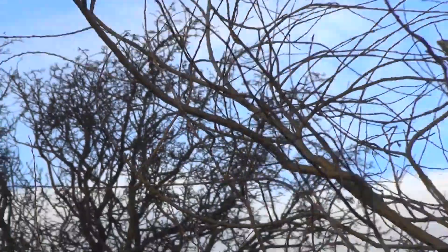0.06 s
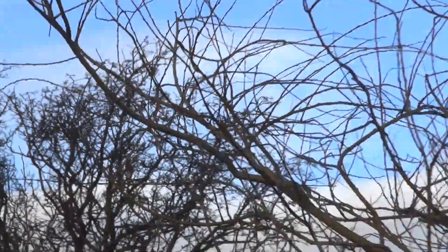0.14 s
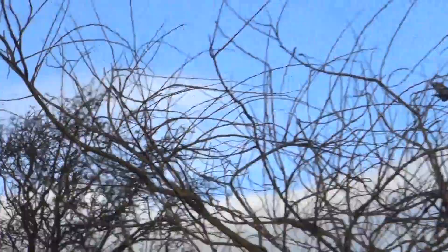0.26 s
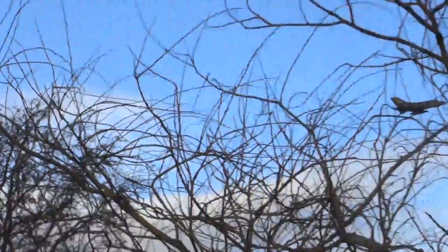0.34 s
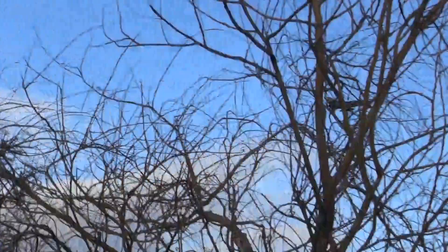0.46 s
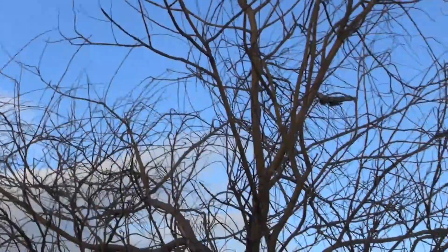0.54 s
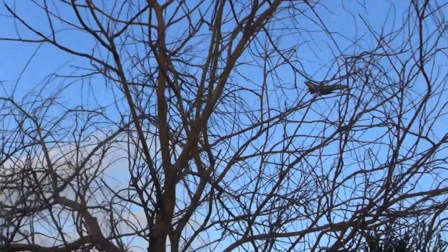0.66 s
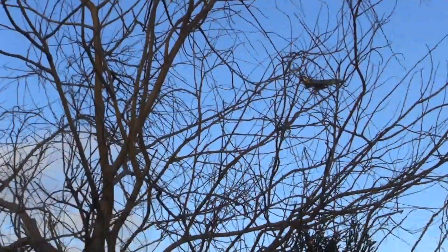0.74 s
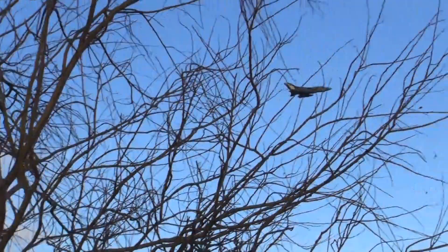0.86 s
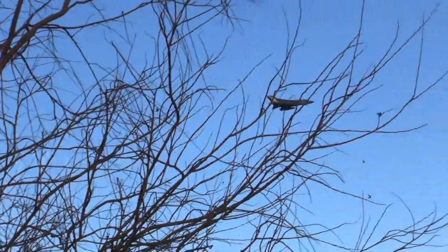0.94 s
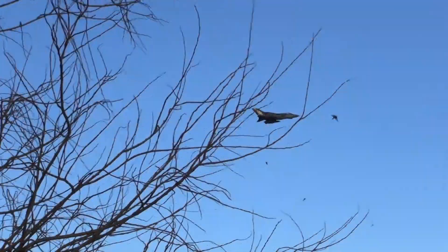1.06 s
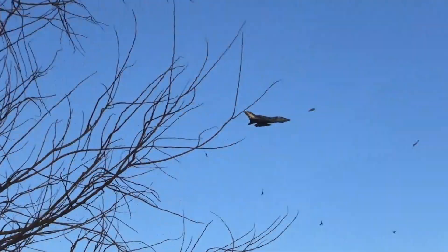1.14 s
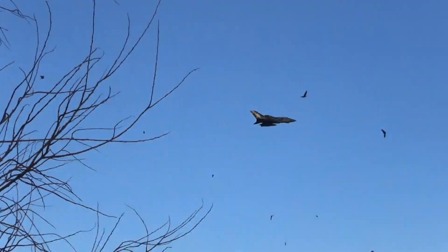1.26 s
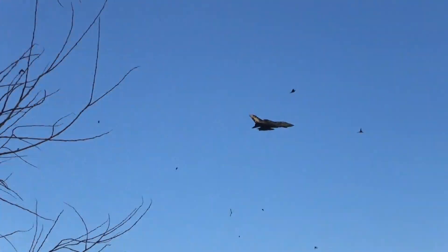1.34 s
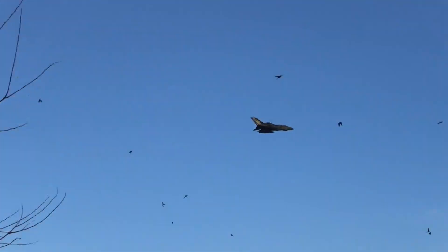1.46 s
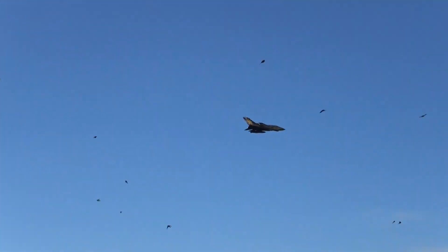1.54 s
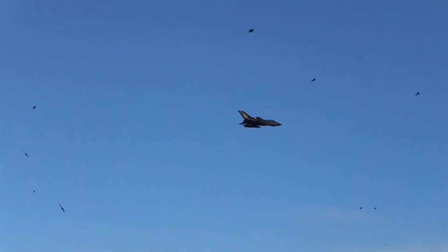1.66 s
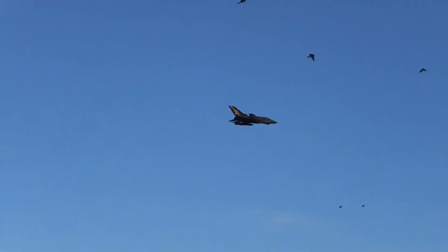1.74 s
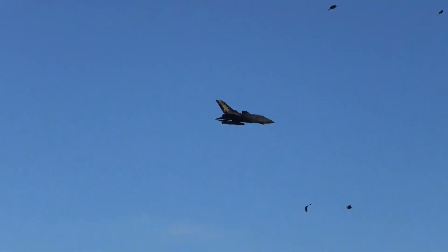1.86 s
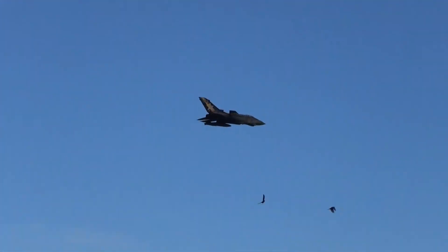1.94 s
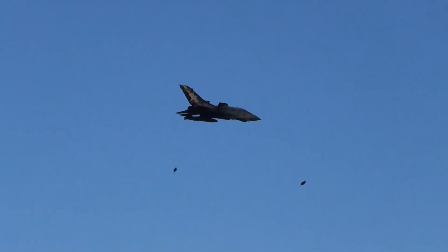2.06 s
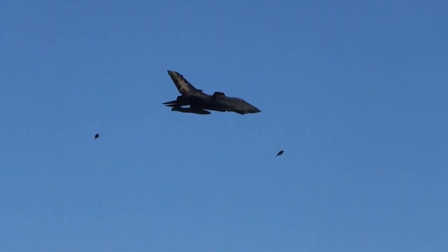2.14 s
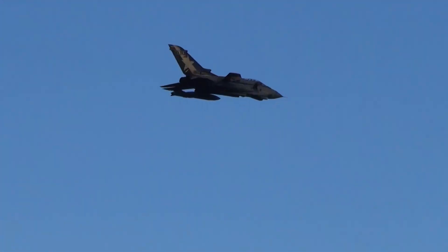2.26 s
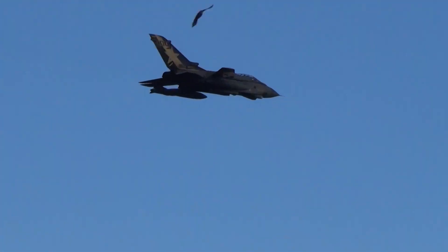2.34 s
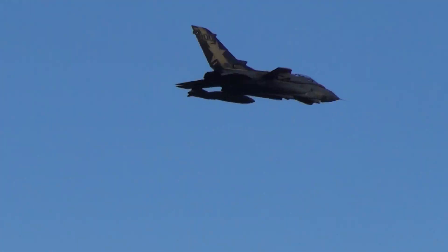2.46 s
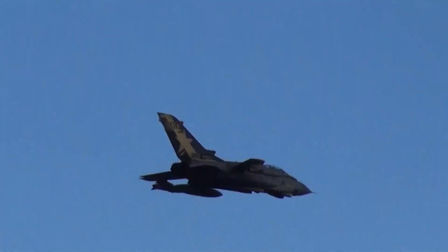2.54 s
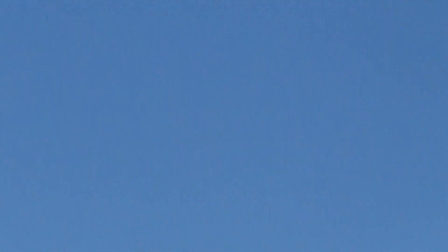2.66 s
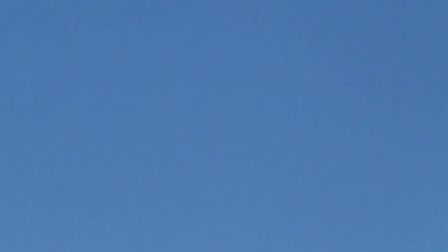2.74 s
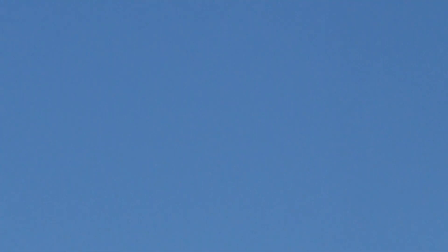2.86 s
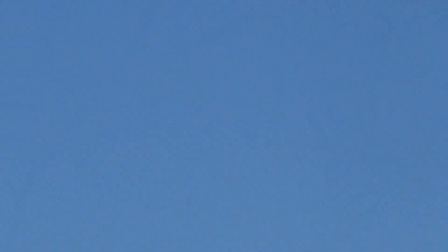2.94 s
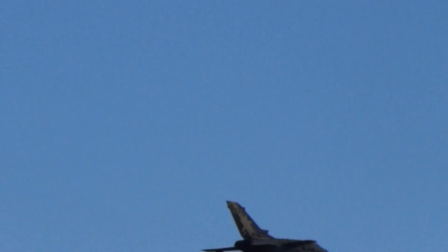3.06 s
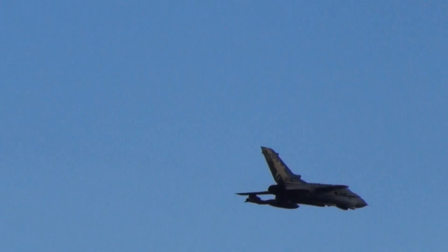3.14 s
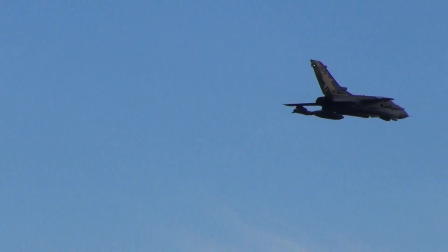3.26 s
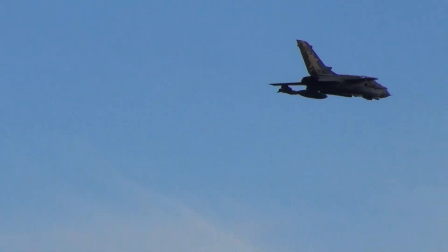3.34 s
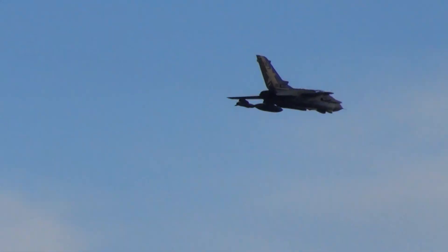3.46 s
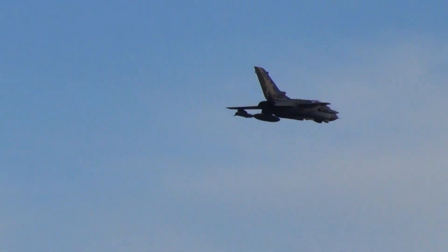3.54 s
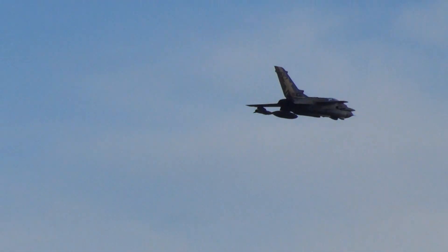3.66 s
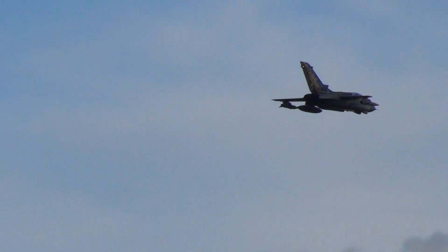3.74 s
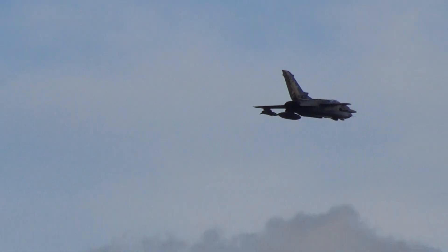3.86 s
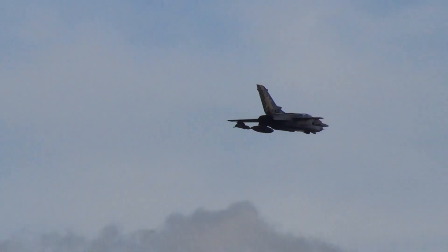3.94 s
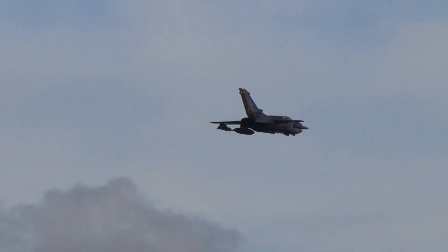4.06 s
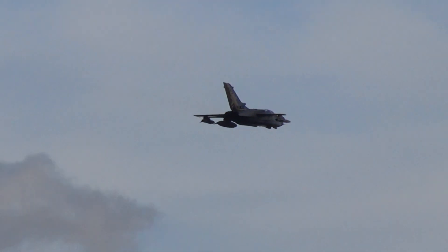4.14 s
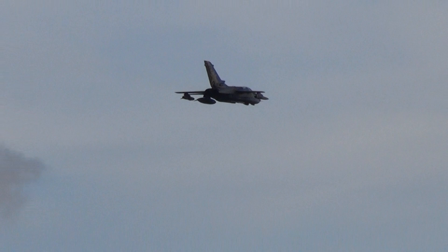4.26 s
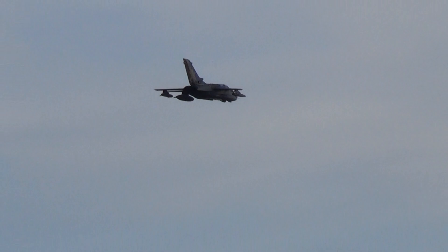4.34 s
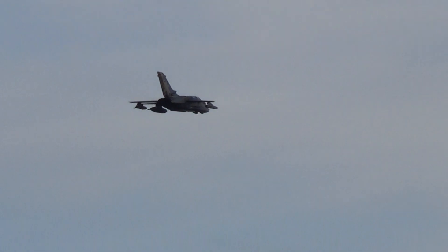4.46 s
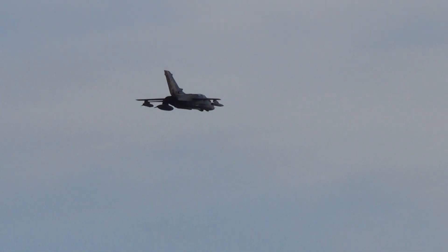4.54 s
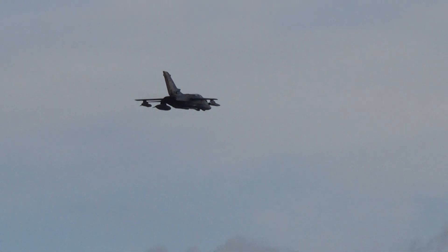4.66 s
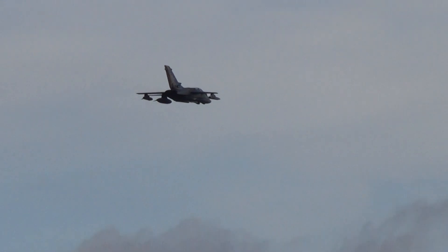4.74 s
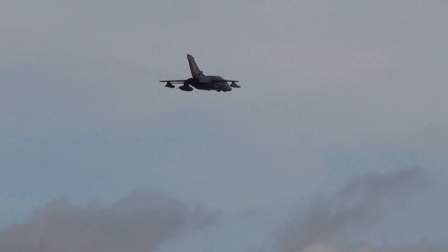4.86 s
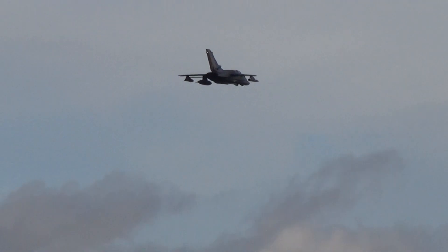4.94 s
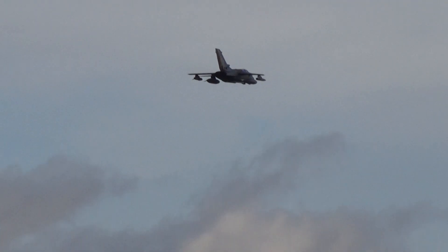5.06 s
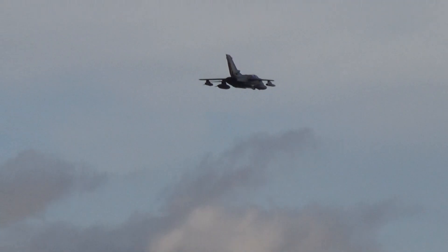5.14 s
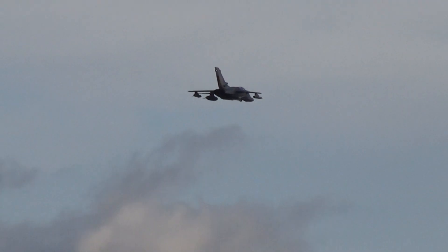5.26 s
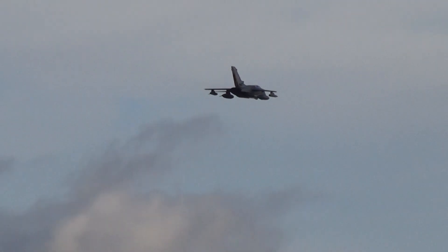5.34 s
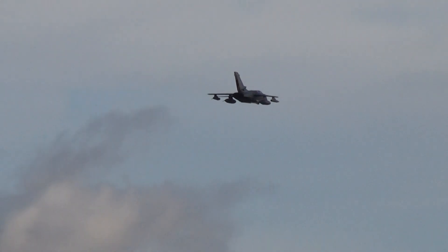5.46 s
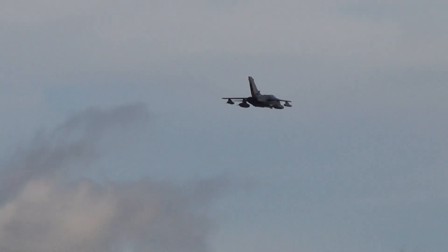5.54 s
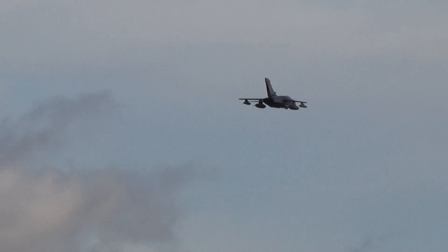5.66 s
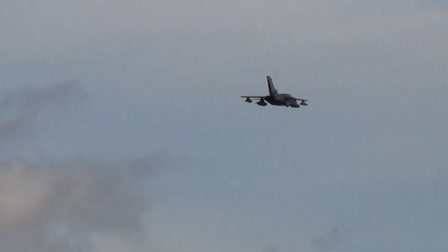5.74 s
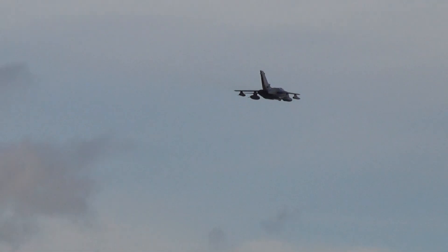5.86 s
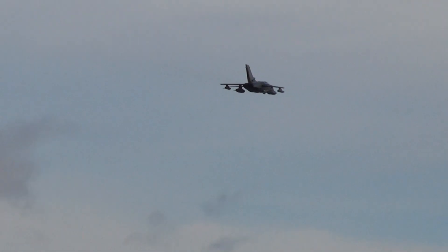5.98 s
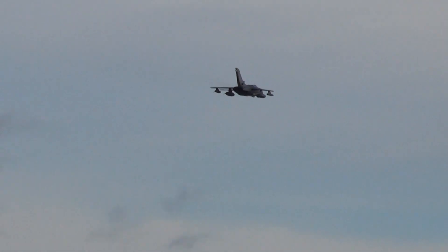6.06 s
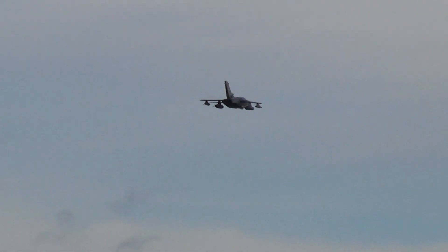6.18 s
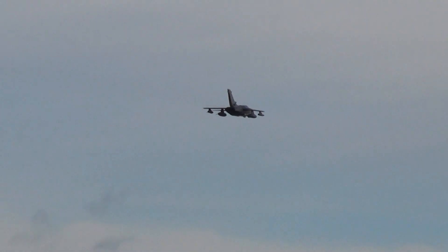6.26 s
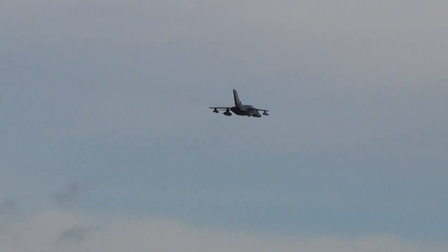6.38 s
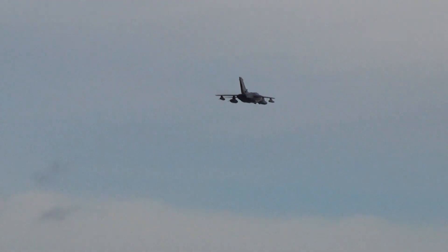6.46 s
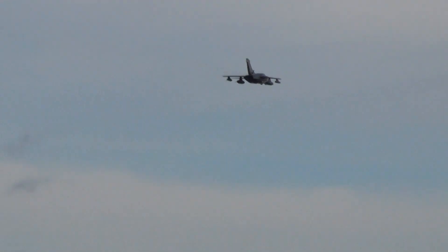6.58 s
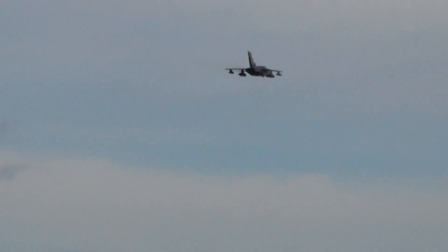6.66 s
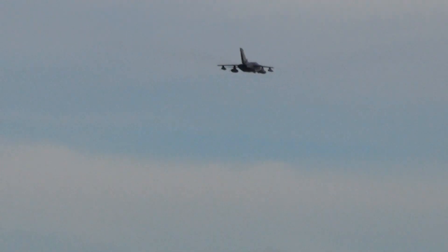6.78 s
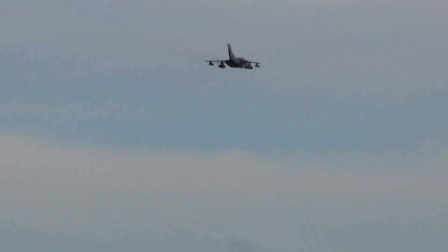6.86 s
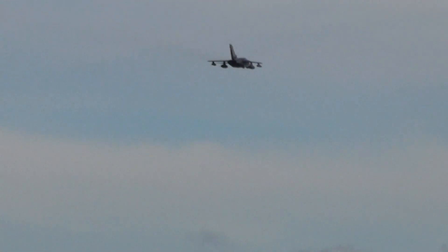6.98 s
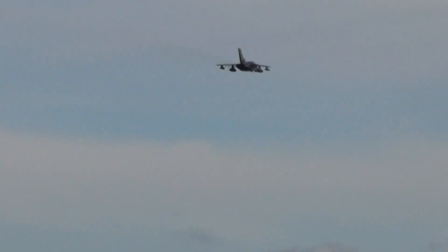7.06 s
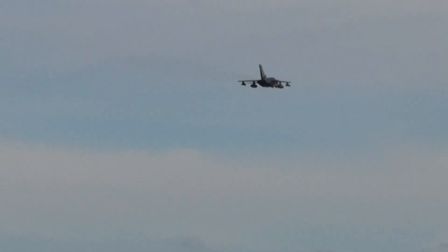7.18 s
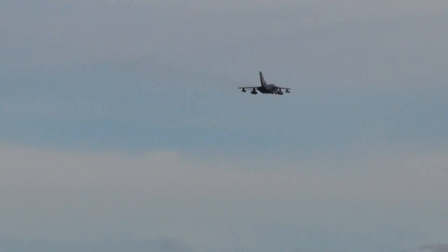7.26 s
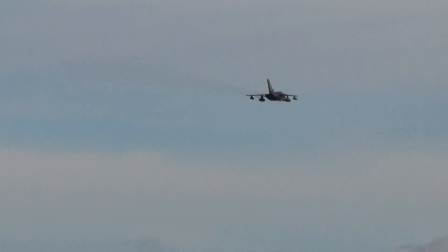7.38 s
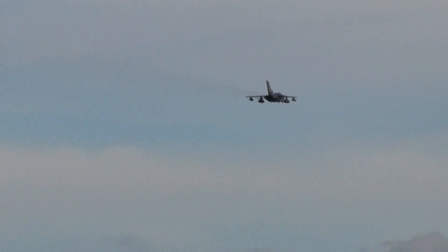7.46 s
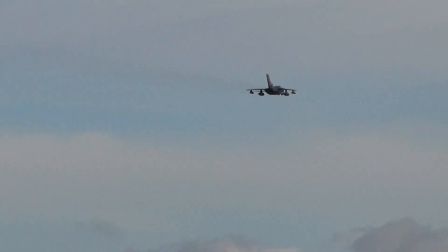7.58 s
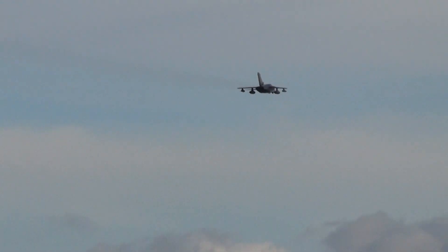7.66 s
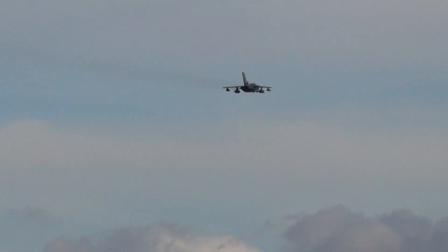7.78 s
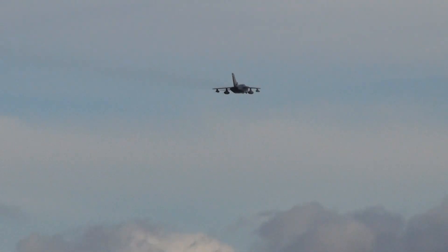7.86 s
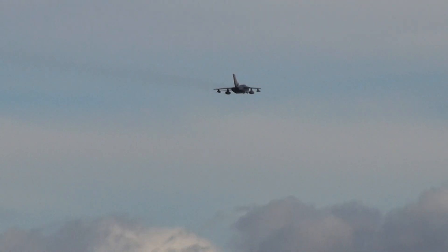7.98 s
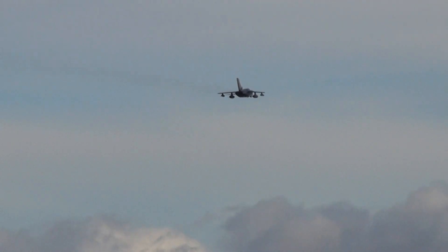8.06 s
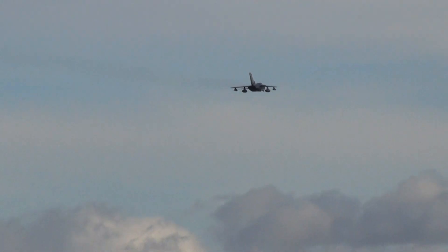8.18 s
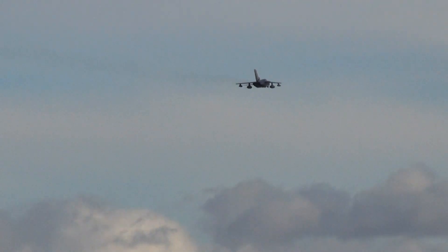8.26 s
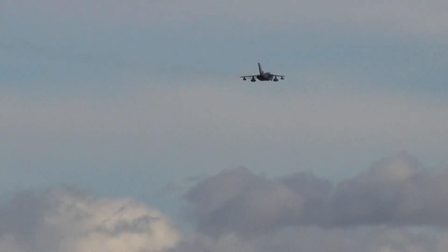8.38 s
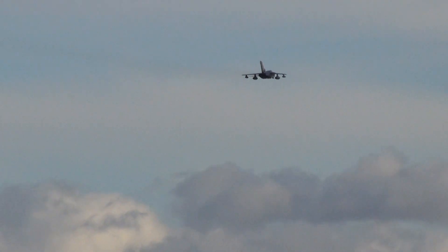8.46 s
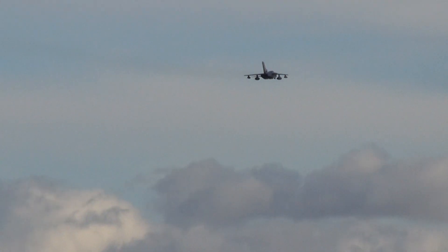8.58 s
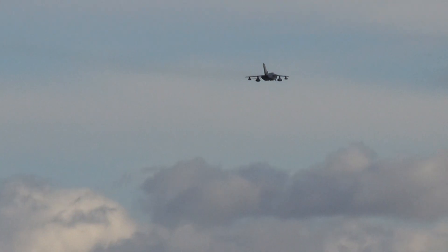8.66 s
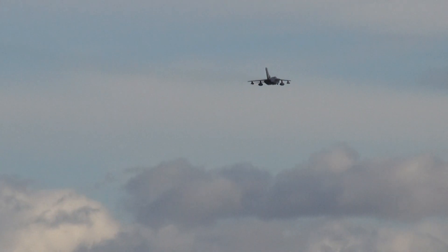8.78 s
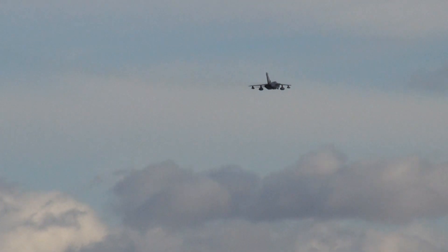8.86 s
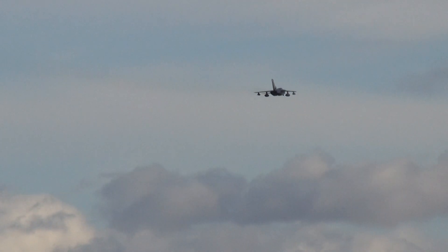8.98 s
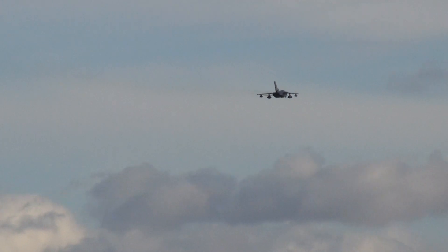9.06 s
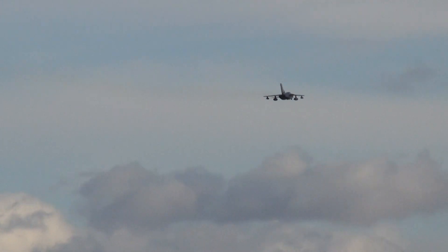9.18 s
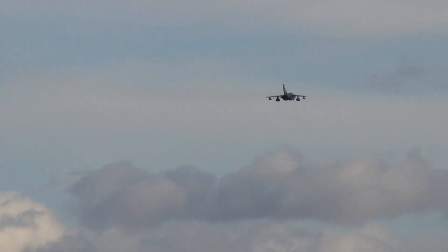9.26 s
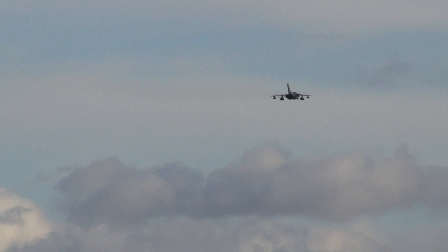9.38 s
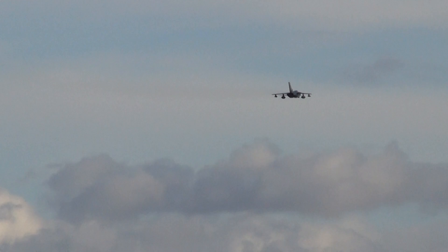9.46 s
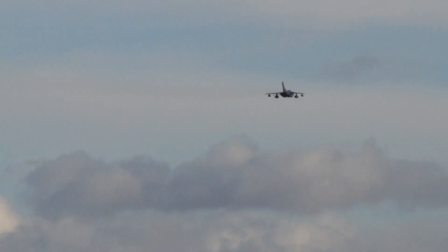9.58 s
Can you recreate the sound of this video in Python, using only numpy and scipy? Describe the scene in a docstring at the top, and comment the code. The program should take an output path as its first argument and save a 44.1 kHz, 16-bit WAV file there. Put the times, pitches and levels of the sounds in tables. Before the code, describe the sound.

Outdoors, a jet approaches low with a swelling roar and a brief falling whine. It tears past with a hollow, sweeping rush and some sizzle, and a sharp click from handling the microphone cuts in. The treble then fades, leaving a deep rumble that surges and slowly recedes. Soft wind bumps the microphone, and tiny, distant bird pips are almost buried.

```python
"""A jet roars low over a field and flies away, with faint birds, wind and clicks from a hand-held camera.
The roar is churning air from two engines, mixed with its echoes off the ground. The exhaust crackles,
distance dulls the treble, and a rumble swells once the tail points back. The camera turns after the jet;
air buffets its microphones, and its plastic case clicks and scrapes."""
import sys
import numpy as np
from scipy import signal
from scipy.fft import rfft, irfft, next_fast_len
from scipy.io import wavfile
from scipy.ndimage import uniform_filter1d, minimum_filter1d, map_coordinates

SR = 44100
rng = np.random.default_rng(int(sys.argv[2]) if len(sys.argv) > 2 else 0)


def master(y):
    """Save y as 16-bit WAV."""
    cut = np.clip(np.atleast_2d(y).T, -1, 1)
    pcm = np.round(cut * 32767)  # scale
    wavfile.write(sys.argv[1], SR, pcm.astype(np.int16))


N = 424241


def amp(db):
    """Turn decibels into a gain."""
    return 10 ** (np.asarray(db) / 20)


def unit(x):
    """Scale x to an average power of 1."""
    return x / np.sqrt(np.mean(np.abs(x) ** 2) + 1e-20)


def along(points, hz):
    """Read (frequency, value) points at hz, on a log frequency axis."""
    f, values = np.transpose(points)
    return np.interp(np.log(hz + 1), np.log(f + 1), values)


def curves(rows, t):
    """Read each column after the time column at times t."""
    times, *columns = np.vstack(rows).T
    return [np.interp(t, times, column) for column in columns]


def fall(t, middle_s, pace_s):
    """A smooth step from 1 down to 0."""
    return .5 - .5 * np.tanh((t - middle_s) / pace_s / 2)


def filtered(x, response):
    """Multiply each frequency in x by response(hz)."""
    size = next_fast_len(N + SR // 2)
    return irfft(rfft(x, size) * response(np.fft.rfftfreq(size, 1 / SR)), size)[..., :N]


def patches(shape, bins, frames):
    """A random pattern, smooth over some frequency bins and time frames."""
    field = uniform_filter1d(rng.standard_normal(shape), bins, 0)
    return unit(uniform_filter1d(field, frames, 1))


def density(spectrum, hz):
    """A spectrum's gains, scaled to an average power of 1 in each frame."""
    gain = amp(along(spectrum, hz))
    return gain / np.sqrt(np.mean(gain ** 2, axis=0))


def hiss():
    """The camera's own noise, nearly the same left and right, lower during the loud passage."""
    spectrum = [(200, 0), (8500, 0), (9600, -1.5), (10400, 0), (14000, -1), (17000, -1), (19000, -3)]  # tone of the hiss: f/Hz, level/dB
    loudness = [(0, -67.5), (.55, -67), (.72, -73.5), (1.5, -77.5), (3.5, -76), (6.5, -74), (7.5, -72),
                (8.3, -68.5), (9.62, -68)]  # its dip and return: t/s, level/dB
    mid, side = unit(filtered(rng.standard_normal((2, N)), lambda hz: amp(along(spectrum, hz))))
    level = amp(curves(loudness, np.arange(N) / SR)[0])
    return level * np.array([mid + .09 * side, mid - .09 * side])


def birds():
    """Far birds give raspy pips, each a puff of noise around one pitch."""
    chirps = [(.56, 0.012, 7000, 120, -74), (3.785, .006, 5800, 600, -66), (4.253, .09, 7500, 250, -82),
              (4.975, .006, 5200, 600, -65), (5.158, 0.0052, 5400, 600, -68), (5.21, .005, 5000, 700, -69),
              (6.111, .007, 4700, 500, -65), (6.48, .009, 5000, 800, -69)]  # bird calls: t/s, half length/s, f/Hz, rasp width/Hz, level/dB
    out, t = np.zeros(N + SR), np.arange(-SR // 4, SR // 4) / SR
    f = np.fft.rfftfreq(len(t), 1 / SR)
    for s, half, hz, width_hz, db in chirps:
        band = np.exp(-((f - hz) / width_hz) ** 2)
        rasp = unit(irfft(rfft(rng.standard_normal(len(t))) * band, len(t)))
        out[round(s * SR) - SR // 4:][:len(t)] += amp(db) * np.exp(-(t / half) ** 2) * rasp
    return out[:N]


def wind():
    """Lumps of air push the two microphones opposite ways, rising as the camera swings round."""
    spectrum = [(10, -8.5), (30, -6), (70, -5.5), (150, -4), (220, -12), (400, -64.5), (800, -130)]  # tone of the buffeting: f/Hz, level/dB
    lumps_per_s = 5
    strengths = rng.standard_normal(round(lumps_per_s * N / SR) + 4)
    lumps = amp(4 * map_coordinates(strengths, [np.arange(N) * lumps_per_s / SR]))
    rise = np.clip(np.arange(N) / SR / 1.1, 0, 1) ** 4
    noise = filtered(rng.standard_normal(N), lambda hz: amp(along(spectrum, hz)))
    push = amp(-48.5) * rise * unit(lumps * noise)
    return np.array([push, -push])


def plastic_case(f):
    """The camera's case rings at a few high pitches; this is its response at f."""
    rings = [(5500, 500, -1.5), (7700, 1200, 3.5), (12000, 1300, 3), (17500, 1500, -8)]  # resonances: f/Hz, width/Hz, level/dB
    return sum((-1) ** k * amp(db) * 1j * f * width / (hz * hz - f * f + 1j * f * width)
               for k, (hz, width, db) in enumerate(rings))


def handling():
    """Short cracks and finger scrapes ring through the camera's case."""
    clicks = [(0.391, -55, 0.015), (.629, -52, .01), (1.9533, -52, 0.016), (2.0825, -41.5, 0.02),
              (2.367, -51.5, 0.032), (2.375, -43.5, 0.0098), (2.383, -26, 0.011), (2.3884, -16, 0.0061),
              (2.409, -44, 0.025), (2.4366, -56, 0.019), (2.728, -41, 0.027), (2.815, -45.5, 0.0099),
              (4.317, -53.5, .004), (4.716, -55.5, 0.0044), (6.177, -61, .003), (6.1985, -56.5, .004),
              (6.2065, -53.5, 0.004), (8.4475, -51.5, 0.013)]  # cracks going into the case: t/s, level/dB, time to fade 60 dB/s
    scrapes = [(1.945, 0.018, -66), (2.098, .02, -59), (2.386, .022, -57), (2.441, 0.02, -64),
               (2.73, 0.017, -63)]  # finger drags going into the case: t/s, half length/s, level/dB
    touch, t = np.zeros(N + SR), np.arange(SR // 10) / SR
    for s, db, fade_s in clicks:
        fade = amp(-60 * t / fade_s) + amp(-22.5 - 60 * t / 0.065)  # a snap and a quiet tail
        touch[round(s * SR):][:len(t)] += amp(db) * fade * rng.standard_normal(len(t))
    now = np.arange(N + SR) / SR
    grit = rng.standard_normal(N + SR)
    grit *= amp(4 * unit(uniform_filter1d(rng.standard_normal(N + SR), size=60)))
    touch += grit * sum(amp(db) * np.exp(-((now - s) / half) ** 2) for s, half, db in scrapes)
    return filtered(touch[:N], plastic_case)


def air_loss(f, t):
    """The longer the sound travels from the jet's straight path, the more treble the air soaks up."""
    mach = 0.61  # jet speed over the speed of sound
    nearest_s, shortest_trip_s = 2.08, 0.88  # when it is heard closest; the sound's travel time then
    loss_db_per_s = 14  # at 4000 Hz
    sent_s = np.linspace(-30, 30, 3000)
    trip_s = np.hypot(shortest_trip_s, mach * sent_s)
    heard_s = nearest_s + sent_s + trip_s - shortest_trip_s
    return amp(-loss_db_per_s * np.interp(t, heard_s, trip_s) * (f / 4000) ** 2.164)


def ground_echoes(f, t):
    """Two echoes each boost and cancel evenly spaced pitches, like the teeth of a comb."""
    main_echo = [(0, 607, 0, 0.018), (.7, 451, 0.2, 0.019), (1, 377, 0.2, 0.025), (1.15, 368, 0, 0.015),
                 (1.3, 391, 0.2, 0.015), (1.5, 418, 0.6, 0.0083), (1.65, 404, 0.85, 0.0077),
                 (1.9, 369.4, 0.85, 0.011), (2.2, 357.5, 0.7, 0.021), (2.4, 370, 0.4, 0.011),
                 (2.6, 392, 0.6, 0.011), (2.9, 406, 0.5, .012), (3.2, 423, 0.9, 0.017),
                 (3.5, 402, 0.5, 0.013), (3.85, 473, 0.55, 0.013), (4.3, 518, 0.1, .3),
                 (6.2, 487, 0.29, 0.38), (9.62, 506, 0.14, 0.3)]  # ground bounce: t/s, tooth spacing/Hz, strength/0-1, phase/turns
    short_echo = [(0, 685, 0.2), (1.2, 653, 0.02), (2.2, 593, 0), (3.2, 675, 0), (3.9, 630, 0.19),
                  (5, 647, 0.06), (7, 629, 0.11), (9.62, 617, 0.02)]  # a shorter bounce: t/s, tooth spacing/Hz, strength/0-1

    def comb(dull_hz, spacing_hz, strength, turns=0):
        """One echo added to the direct sound; rough ground scatters it away above dull_hz."""
        echo = strength / (1 + (f / dull_hz) ** 2)
        return np.abs(1 + echo * np.exp(2j * np.pi * (f / spacing_hz - turns))) / np.sqrt(1 + echo ** 2)

    return comb(1440, *curves(main_echo, t)) * comb(3500, *curves(short_echo, t))


def flicker_db(f, t):
    """Swirls of air shake the treble most; the exhaust's fast tearing smooths out with distance."""
    shape = len(f), len(t)
    swirls = 1.58 * patches(shape, 30, 10) + 0.35 * patches(shape, 30, 3)
    tearing = 1.04 * fall(t, middle_s=6.4, pace_s=.4) * patches(shape, 90, 4)
    slow_bands = 1.3 * patches(shape, 3, 30)
    return np.clip(f / 1500, .3, 1) * (swirls + tearing) + slow_bands


def surges_db(f, t):
    """The roar flares or drops as it crosses unsteady air, later and longer in the low notes."""
    surges = [(0.18, 0.11, -7, 1490, 3.5), (0.1, 0.16, 2.5, 1425, 0.061), (0.146, .2, -4, 4980, 0.61),
              (0.29, 0.05, 6.5, 900, 1.5), (0.317, 0.058, -6.5, 1310, 0.14), (0.545, 0.054, 3, 1040, 0.26),
              (0.767, 0.046, 5.5, 4050, 1.9), (0.882, 0.044, 7.5, 694, 0.86), (0.986, 0.046, 4, 3300, 1.2),
              (1.213, 0.071, 7, 4400, 1), (1.193, 0.028, 4.5, 754, 0.44), (1.443, 0.016, 4.5, 3020, 0.65),
              (1.583, .02, 2.5, 2640, 0.78), (1.799, .02, 7, 4000, 0.98), (2.178, 0.019, -1, 2760, 1.7),
              (2.261, 0.012, 3, 3000, 1.1), (2.568, 0.024, -6.5, 2800, 0.82), (2.681, .025, -2, 3000, 1.8),
              (3.056, 0.046, -3.5, 1680, .7), (3.302, 0.024, -2, 1800, 1.2), (4.64, 0.038, -0.5, 2500, 1.1),
              (4.886, .03, 3.5, 1490, 1.7), (5.47, 0.025, -0.5, 4000, .6), (5.64, 0.062, -2.5, 1800, 1.5),
              (6.04, .06, -1, 1500, 1.3), (6.248, 0.016, 3, 1500, 1.7), (1.665, 0.081, 5.5, 1254, 0.27),
              (1.812, 0.16, 3.5, 1005, 1.7), (2.056, 0.045, 2.5, 2500, 2), (2.413, 0.083, 4.5, 1500, 0.85),
              (2.737, 0.048, 6, 768, 0.58), (2.902, 0.095, 6, 1210, 1.7), (3.168, 0.045, 3, 2084, 1.6),
              (3.186, 0.073, 9, 808, 0.61), (3.168, 0.058, 9, 2000, 0.32), (3.837, 0.056, 3.5, 1890, 0.23),
              (3.83, 0.033, 3, 1400, 0.17), (4.28, 0.05, 12, 1860, 0.17), (2.603, 1, -4.5, 1664, 0.23),
              (2.512, 0.92, 3.5, 414, 0.32), (1.672, 0.11, -4, 1006, .15), (3.413, 0.031, 4.5, 2180, 1.7),
              (3.844, 0.063, 9.5, 2020, 2.9), (4.025, 0.044, 6.5, 2310, 1.9),
              (4.204, 0.037, 8.5, 690, 0.79), (4.284, 0.053, 3, 2100, 1.9), (4.357, 0.059, 7.5, 4500, .9),
              (4.49, 0.11, 6.5, 1500, 1), (4.711, .035, 6, 2490, 1.1), (4.814, 0.09, 9, 1012, 1.1),
              (5.005, 0.08, 5, 2560, 0.73), (5.243, 0.073, 2, 306, 0.74), (5.157, 0.045, 7.5, 637, 1.7),
              (5.442, 0.087, -6, 450, 1.2), (5.738, 0.11, 4.5, 1810, 3), (5.799, 0.078, 6.5, 650, 0.87),
              (5.896, 0.094, 5.5, 292, 0.43), (6.264, 0.064, 8.5, 306, 0.28), (6.189, 0.052, 8, 1100, 2.1),
              (6.41, 0.059, 6, 110, 1.3), (6.562, 0.081, -5, 248, 0.61), (5.724, 0.071, 6, 2600, 0.62),
              (6.2, 0.082, 2.5, 2410, 0.5), (7.305, 0.078, 3, 2330, 0.7), (2.05, .12, 2, 1060, 0.12),
              (.6, 0.027, 0, 220, .6), (4.52, 0.045, 6, 950, 0.24), (5.717, 0.03, 4.5, 1350, 0.31),
              (5.95, 0.096, -6, 1000, 0.26), (6.442, .05, -5, 600, 0.31), (7.65, 0.089, 3.5, 680, .3),
              (7.902, 0.15, 8, 1580, .2), (8.603, .06, 6, 1650, .2), (9.0, .05, 2, 1900, .3),
              (9.277, .07, 4.5, 1790, 0.15), (9.3, .12, -6, 1000, 0.55), (8.398, 0.56, 11.5, 326, 0.12),
              (7.301, 0.11, 2.5, 1300, 2.6), (7.425, .08, 0.5, 245, 0.75), (7.605, 0.051, 3.5, 600, 1),
              (7.86, 0.046, 6.5, 381, 1.6), (8.27, 0.13, 4.5, 382, 2.5), (8.35, 0.092, -5, 90, 1.8),
              (8.835, 0.13, -9.5, 260, 0.8), (9.433, 0.18, 6.5, 328, 2.9)]  # flares and drops: t/s, half length/s, change/dB, f/Hz, reach/octaves
    octaves_down = np.log2(1500 / np.clip(f, 100, 1500))
    lag_s, stretch = 0.03 * octaves_down, 1 + 0.024 * octaves_down
    total = np.zeros((len(f), len(t)))
    for s, half, db, hz, octaves in surges:
        near = slice(*np.searchsorted(t, [s - 4 * half, s + 4 * half + lag_s.max()]))
        time_gap = (t[near] - lag_s - s) / (half * stretch)
        pitch_gap = np.log2((f + 1) / hz) / octaves
        total[:, near] += db * np.exp(-time_gap ** 2 - pitch_gap ** 2)
    return total


def microphones(direct, scattered, f, t):
    """The jet drifts left to right as the camera turns; sound off trees and ground widens it."""
    aim = [(0, 0.9), (1.5, 0.8), (2.5, 0.7), (3.5, 0.1), (4.5, -0.2), (5.5, -.45), (7.5, -0.45),
           (8.3, -0.55), (9.62, -0.45)]  # camera's turn: t/s, left over right before weighting/dB
    weights = [(60, .3), (120, 0.83), (240, 1.6), (350, 3.3), (500, 1.4), (700, 1.9), (1000, 4.1),
               (1400, 1.9), (2000, 1.9), (2800, 4.4), (3900, 2.4), (5500, 1.7), (8000, .4)]  # how much each pitch follows the turn: f/Hz, weight
    lean = [(60, 2.5), (120, 0.1), (240, 1.5), (350, 1.3), (500, 2.5), (700, 4), (1000, 1.9), (1400, 1.7),
            (2000, 2), (2800, 3), (3900, 3.5), (6000, 2.7)]  # steady lean: f/Hz, left over right/dB
    left_db = along(weights, f) * curves(aim, t)[0] + along(lean, f)
    side = amp(-28.5) * scattered
    return direct * amp([left_db / 2, -left_db / 2]) + np.array([side, -side])


def crackle():
    """Many tiny shocks in the exhaust make a tearing sizzle over the roar."""
    spectrum = [(2500, -59.5), (4500, 0.5), (6000, -5), (7500, -12), (10000, -14), (16000, -32.5),
                (20000, -60)]  # tone of the shocks: f/Hz, level/dB
    loudness = [(0, -98), (.6, -84), (.85, -63), (1.1, -75), (1.3, -65), (1.5, -82), (2, -63), (2.4, -72),
                (2.9, -72), (3.2, -66), (3.4, -86), (4.1, -89.5), (4.28, -71.5), (4.42, -80), (4.55, -72.5),
                (4.65, -79.5), (4.8, -75), (5, -82), (5.25, -92), (6, -93.5), (6.18, -77.5), (6.3, -98),
                (9.62, -100)]  # bursts of sizzle: t/s, level/dB
    shocks_per_s, spread_db = 700, 9.5
    chance, size = rng.random(N), rng.exponential(size=N)
    shocks = (chance < shocks_per_s / SR) * amp(spread_db * np.minimum(size, 4))
    sizzle = unit(filtered(shocks, lambda hz: amp(along(spectrum, hz))))
    return amp(curves(loudness, np.arange(N) / SR)[0]) * sizzle


def intake_whine(f, t, doppler):
    """A breathy note from the engine intakes sinks in pitch as they pass."""
    pitch_hz = 754 * doppler ** 1.6
    level_db = -26 - 15.5 * (t - 0.7) ** 2  # loudest at 0.7 s
    band = np.exp(-((f / pitch_hz - 1) / 0.07) ** 2)
    return amp(level_db) * band / np.sqrt(np.mean(band ** 2, axis=0))


def engines(f, t):
    """Churning air makes bands of noise, from deep rumble to airy fizz, whose powers add up."""
    # tone of each band, lowest first: f/Hz, level/dB
    deep = [(10, -60), (25, -27), (45, -11.5), (70, 17.5), (95, -8), (150, -56.5), (300, -130)]
    rumble = [(20, -93), (40, -47), (64, -28), (102, -8), (130, 1.5), (171, 4), (222, -1.5), (300, -13.5),
              (390, -36.5), (800, -130)]
    low_roar = [(30, -79.5), (150, -14), (260, 7.5), (380, 8.5), (520, -5), (800, -55.5), (1600, -130)]
    mid_roar = [(250, -130), (430, -21), (540, -1), (700, -1.5), (840, -4), (950, -10), (1600, -130)]
    high_roar = [(40, -82.5), (200, -43), (400, -15), (600, -1), (1000, 0.5), (1300, 0.5), (1650, -1),
                 (2000, -2), (2500, -5.5), (4000, -9.5), (5500, -12), (6000, -29), (6600, -28),
                 (7300, -32.5), (8000, -35), (10000, -130)]
    fizz = [(4000, -60), (5500, -3.5), (6200, 1), (7000, -5.5), (7800, -12), (9500, -40)]
    # slow swell of the bands: t/s, then level/dB for deep, rumble, low, mid and high roar
    levels = [(0, -74, -52, -33, -27.5, -17), (.65, -63, -60.5, -35, -39, -17),
              (.92, -57, -54, -26.5, -29, -14.5), (1.1, -37.5, -40, -20, -23.5, -16.5),
              (1.8, -38.5, -30.5, -23, -24.5, -19.5), (2.5, -40.5, -29.5, -21.5, -24, -19),
              (3.05, -52, -27, -21.5, -28.5, -24), (3.45, -45.5, -17.5, -23, -29.5, -27.5),
              (3.9, -45, -24, -26.5, -33, -30.5), (4.4, -38.5, -16.5, -29, -28.5, -28.5),
              (5, -33.5, -19, -22.5, -31, -30), (5.5, -35, -22.5, -29, -38, -33),
              (6.2, -34, -18.5, -26, -32, -31.5), (6.7, -45.5, -24, -37.5, -37.5, -35),
              (7.4, -41, -16.5, -30.5, -32.5, -34.5), (7.9, -40, -28.5, -34, -40, -38),
              (8.5, -26.5, -29, -39, -43, -38.5), (9, -42, -22, -32.5, -37.5, -37),
              (9.62, -40, -34.5, -38.5, -52.5, -41.5)]
    fizz_level = [(0, -90), (.7, -81), (1.1, -74.5), (1.5, -70), (1.9, -65), (2.3, -68), (2.7, -73),
                  (3.2, -76.5), (3.7, -88), (9.62, -110)]  # swell of the fizz: t/s, level/dB
    rumble_pitch = [(0, 149.4), (3.4, 139.3), (4.05, 136), (4.65, 175.2), (5.5, 142), (6.25, 168.3),
                    (6.6, 139.4), (7.25, 153.4), (7.75, 127), (8.3, 139), (9.62, 152)]  # wandering centre of the exhaust rumble: t/s, f/Hz
    deep_db, rumble_db, low_db, mid_db, high_db = curves(levels, t)
    rumble_shift = curves(rumble_pitch, t)[0] / 150  # unshifted, it centres on 150 Hz
    doppler = 1 + 0.47 * fall(t, middle_s=0.6, pace_s=0.17)  # higher pitch while the jet approaches
    bands = [amp(deep_db) * density(deep, f),
             amp(rumble_db) * density(rumble, f / rumble_shift),
             amp(low_db) * density(low_roar, f / doppler),
             amp(mid_db) * density(mid_roar, f),
             amp(high_db) * density(high_roar, f / doppler) * air_loss(f, t),
             amp(curves(fizz_level, t)[0]) * density(fizz, f),
             intake_whine(f, t, doppler)]
    return np.sqrt(sum(band ** 2 for band in bands))


def jet():
    """Noise, cut into short frames, is shaped by the engines, the ground and the moving air."""
    frames = dict(nperseg=1024, noverlap=768)
    hz, t, noise = signal.stft(rng.standard_normal((2, N)), SR, **frames)
    f = hz[:, None]
    wavering = amp(flicker_db(f, t) + surges_db(f, t))
    direct, scattered = noise * engines(f, t) * ground_echoes(f, t) * wavering
    return signal.istft(microphones(direct, scattered, f, t), SR, **frames)[1][:, :N]


def scene():
    """All sources in stereo; crackle and handling sit a little to the left."""
    return jet() + crackle() * amp([[1.5], [-1.5]]) + wind() + handling() * amp([[.3], [-.3]]) + birds()


def record(dry):
    """The camera cuts deep bass, limits peaks, adds hiss, fades at the end and drops the top treble."""
    bass_hz, top_hz, ceiling_db, fade_s = 35, 18260, -7.4, .02
    dry = filtered(dry, lambda hz: hz ** 2 / (hz ** 2 + bass_hz ** 2))
    safe_gain = np.minimum(1, amp(ceiling_db) / (np.abs(dry).max(axis=0) + 1e-9))
    held = minimum_filter1d(safe_gain, size=400, origin=190)
    held = uniform_filter1d(held, size=10, origin=4)  # grabs so fast that it ticks
    gain = np.minimum(held, uniform_filter1d(held, size=901, origin=450))  # lets go more slowly
    fade = np.clip((N - np.arange(N)) / SR / fade_s, 0, 1)
    return filtered((dry * gain + hiss()) * fade, lambda hz: hz < top_hz)


dry = scene()
out = record(dry)
master(out)
```